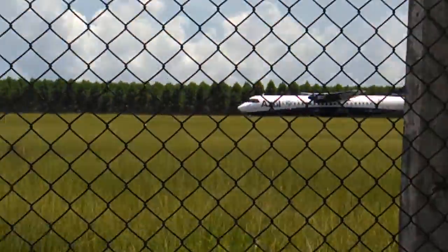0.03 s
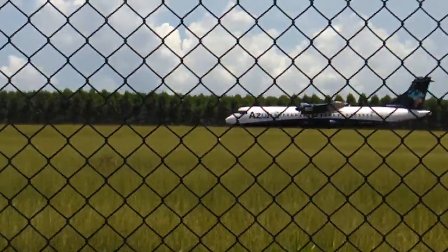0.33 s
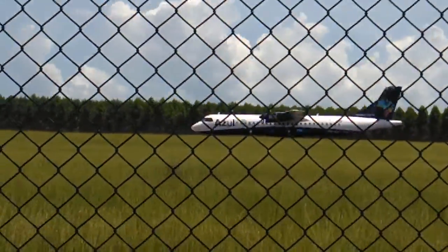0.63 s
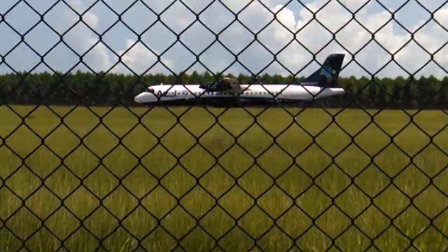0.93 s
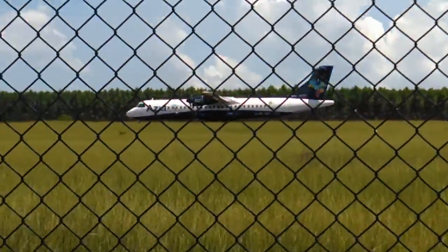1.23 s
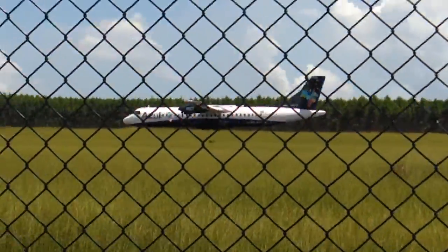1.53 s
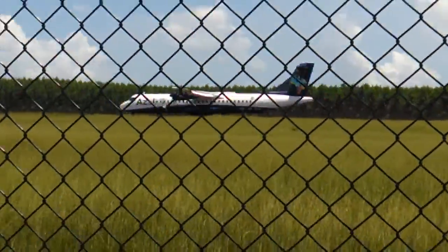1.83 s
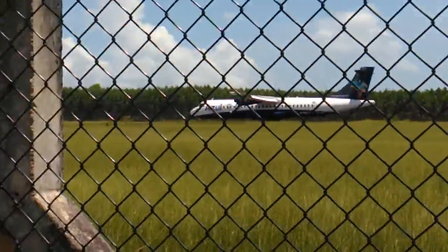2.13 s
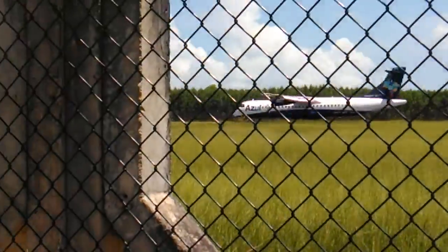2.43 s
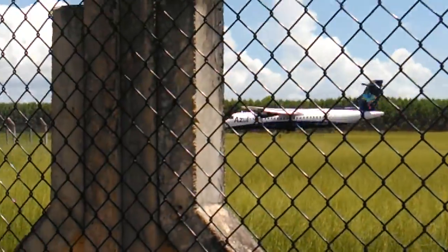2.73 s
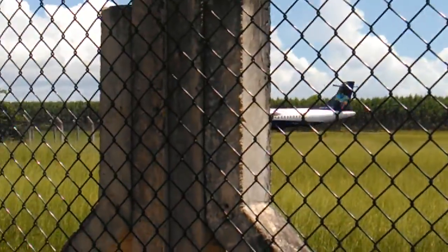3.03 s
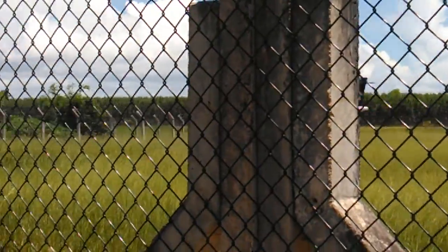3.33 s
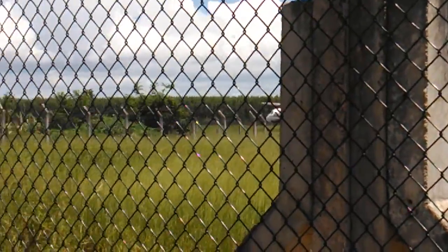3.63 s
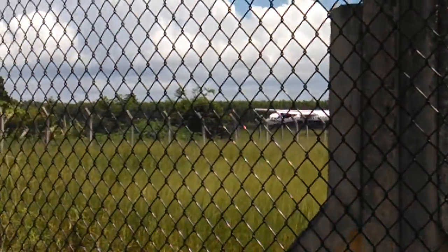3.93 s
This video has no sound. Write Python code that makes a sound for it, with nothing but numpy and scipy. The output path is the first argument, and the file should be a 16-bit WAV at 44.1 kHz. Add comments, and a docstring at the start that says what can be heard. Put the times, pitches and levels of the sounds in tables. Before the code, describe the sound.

A twin-engine propeller plane rolls along a runway with a broad roar, fluttering turbine hiss and a faint low drone. Midway, two gusts of wind rush and whistle over the microphone, then the engines carry on outdoors.

```python
"""Turboprop beyond the fence

A twin turboprop rolls along a runway: a low propeller note sinks under a broad roar and turbine hiss.
The hiss changes colour as the aircraft turns its side and then its tail to the listener.
Two gusts of wind rush over the microphone and sound its hollow resonances."""
import sys
import numpy as np
from scipy import signal
from scipy.fft import rfft, irfft, next_fast_len
from scipy.io import wavfile
from scipy.ndimage import uniform_filter1d, map_coordinates

SR = 44100
rng = np.random.default_rng(int(sys.argv[2]) if len(sys.argv) > 2 else 0)


def put_to_file(sound):
    """Save the sound as 16-bit audio at rate SR, in the file named by the first command-line argument."""
    columns = np.atleast_2d(sound).T  # one column per channel
    safe = np.clip(columns, -1, 1)
    whole_steps = np.round(safe * 32767)
    wavfile.write(sys.argv[1], SR, whole_steps.astype(np.int16))


N = 176400

# Hollow howl of the engine roar that bridges the gusts: time_s, level_db
HOWL_FADER = [(1.4, -53), (1.55, -39), (1.64, -30.5), (1.8, -35.5), (1.92, -35.5), (2.1, -34.5),
              (2.33, -41), (2.48, -51), (2.65, -58)]
# Its single broad hump: frequency_hz, gain_db
HOWL_EQ = [(450, -47), (620, -9), (780, 3), (930, 1.5), (1030, -6), (1200, -24), (2000, -55)]
# Rush of wind on the microphone: time_s, level_db
GUST_FADER = [(0, -63), (1.2, -41), (1.45, -30.5), (1.54, -28), (1.61, -32), (1.68, -22), (1.76, -25),
              (1.84, -28.5), (1.92, -28.5), (2.0, -38.5), (2.09, -33.5), (2.2, -25), (2.25, -23.5),
              (2.31, -20), (2.39, -23.5), (2.47, -28.5), (2.6, -39.5), (2.9, -47), (4, -50)]
# The hollow resonances it sounds: frequency_hz, gain_db
GUST_EQ = [(300, -60), (520, -40), (700, -7.5), (880, -1), (1000, -7), (1130, -7.5), (1280, -0.5),
           (1520, 1.5), (1780, -1), (1930, -8), (2080, 1), (2280, 3), (2430, -1), (2560, 5), (2690, 3),
           (2950, -10), (3400, -7.5), (3680, 3.5), (4000, -2.5), (4400, -9), (4900, -11), (5220, -5),
           (5600, -27), (6500, -11), (8000, -16.5), (10000, -27), (12000, -44), (15000, -62)]
# Whistle on the crest of each gust: time_s, level_db
WHISTLE_FADER = [(1.2, -57), (1.52, -29.5), (1.62, -37.5), (1.68, -20), (1.71, -22), (1.745, -16.5),
                 (1.82, -25), (1.9, -26.5), (2.0, -37), (2.12, -29.5), (2.18, -26.5), (2.27, -25),
                 (2.33, -18), (2.385, -16.5), (2.46, -24.5), (2.57, -33), (2.64, -43.5), (2.9, -60)]
# Its airy colour at rest: frequency_hz, gain_db
WHISTLE_EQ = [(2500, -49), (3500, -20), (4050, -11), (4350, -2), (4750, -1), (4980, -6.5), (5150, 4.5),
              (5370, 0.5), (5600, -3.5), (6000, -3.5), (6600, -10), (7600, -21), (9000, -24.5),
              (10500, -33), (12000, -54), (15000, -66)]
# Its bend, taken as a ratio to the resting pitch in the last row: time_s, pitch_hz
WHISTLE_BEND = [(1.4, 5420), (1.75, 5280), (2.15, 5208), (2.4, 5270)]

# Blade-passing note, sinking: time_s, pitch_hz
BLADE_NOTE = [(0, 95.5), (.5, 94.6), (.9, 89.5), (1.4, 90.7), (2.3, 88.7), (4, 87.3)]
# Its uneven fade: time_s, level_db
BLADE_FADER = [(0, -47), (.2, -49), (.35, -55.5), (.58, -50), (.8, -57.5), (.92, -60), (1.0, -56.5),
               (1.1, -65), (1.2, -57), (1.42, -58.5), (1.68, -73), (1.98, -63.5), (2.1, -67), (2.32, -61),
               (2.44, -76), (2.9, -66), (3.2, -74), (4, -69)]
# Turbine whine as the engines pass: time_s, level_db
WHINE_FADER = [(.55, -57), (.82, -40), (1.1, -39.5), (1.4, -39), (1.7, -50), (2, -72)]
# Its two narrow peaks: frequency_hz, gain_db
WHINE_EQ = [(2300, -45), (2670, 2.5), (3050, -36), (5000, -33), (5430, 3), (5900, -39)]

# Deep rumble under the roar: time_s, level_db
RUMBLE_FADER = [(0, -38.5), (.3, -42.5), (.58, -39), (.9, -48), (1.15, -47), (1.35, -48), (1.45, -44.5),
                (1.58, -52.5), (1.68, -49.5), (1.91, -57), (2.04, -44.5), (2.15, -49.5), (2.3, -49),
                (2.42, -53), (2.9, -50.5), (3.15, -49.5), (3.3, -50), (3.43, -46), (3.55, -48.5),
                (3.71, -43.5), (3.85, -49.5), (4, -52)]
# Its bass weight: frequency_hz, gain_db
RUMBLE_EQ = [(25, -45), (60, -24), (85, -22), (120, -6), (160, -3), (205, 1), (260, -3), (350, -4),
             (700, -53), (2000, -110)]
# Low roar: time_s, level_db
LOW_ROAR_FADER = [(0, -37.5), (.2, -39.5), (.36, -39.5), (.46, -36), (.58, -35.5), (.75, -34.5), (.88, -46),
                  (1.0, -42), (1.11, -38.5), (1.17, -33.5), (1.29, -39.5), (1.35, -44), (1.43, -37),
                  (1.62, -43), (1.8, -45), (1.93, -54.5), (2.05, -50), (2.27, -51.5), (2.4, -52.5),
                  (2.52, -49), (2.65, -54), (2.9, -48), (3.17, -50.5), (3.4, -41.5), (3.7, -46.5),
                  (3.8, -47.5), (4, -42)]
# Its low-mid body: frequency_hz, gain_db
LOW_ROAR_EQ = [(50, -70), (150, -38), (230, -7), (310, -1), (410, -1), (510, -5), (800, -15.5), (1500, -25),
               (4000, -100)]
# Mid roar of the engines: time_s, level_db
MID_ROAR_FADER = [(0, -36), (.2, -35), (.45, -34), (.58, -33), (.72, -39.5), (.82, -34.5), (.88, -39.5),
                  (1.0, -42.5), (1.06, -35.5), (1.19, -35), (1.3, -32), (1.36, -39.5), (1.46, -32.5),
                  (1.6, -39), (1.85, -41), (2.05, -39.5), (2.3, -35.5), (2.45, -50), (2.64, -47),
                  (2.8, -48), (2.93, -45), (3.03, -52), (3.3, -39.5), (3.6, -35), (3.72, -35.5),
                  (3.8, -31.5), (4, -34.5)]
# Its midrange colour: frequency_hz, gain_db
MID_ROAR_EQ = [(150, -63), (400, -44), (520, -6), (640, 0), (860, 0.5), (1000, -1.5), (1160, -10),
               (1450, -3.5), (1900, -12), (2800, -9.5), (5000, -62), (10000, -90)]

# Master fader over all bands of the turbine hiss: time_s, gain_db
HISS_FADER = [(0, -28.5), (.06, -26.5), (.11, -29.5), (.2, -27), (.27, -27.5), (.35, -26), (.5, -28),
              (.63, -26), (.75, -29.5), (.81, -28.5), (.87, -32), (.95, -32), (1.01, -26.5), (1.09, -27.5),
              (1.3, -25.5), (1.37, -28), (1.52, -26.5), (2.0, -31), (2.5, -31.5), (2.64, -34.5),
              (2.8, -33.5), (2.93, -37.5), (3.11, -38.5), (3.16, -32.5), (3.45, -34), (3.7, -34),
              (3.8, -31.5), (3.9, -37.5), (4, -37)]
# Hiss heard from the front: frequency_hz, gain_db
FRONT_EQ = [(650, -35), (1100, -22), (1300, -19), (1550, -10), (1750, -9), (2150, -7.5), (2350, -2),
            (2550, -5.5), (2800, -0.5), (3300, -1.5), (3650, 2.5), (4100, 1), (4450, -5), (4650, -3),
            (5600, -5.5), (6200, -9.5), (8300, -16.5), (10900, -28), (12800, -41), (15500, -47)]
# Hiss heard from the side: frequency_hz, gain_db
SIDE_EQ = [(650, -41), (1100, -7.5), (1550, -11.5), (1750, -12), (2000, -2), (2200, -3), (2400, 1),
           (2650, -0.5), (3000, -1), (3600, -1.5), (4100, 0.5), (4600, -0.5), (4900, -0.5), (5400, 0.5),
           (5950, -5.5), (7300, -9), (8700, -12.5), (11000, -25), (12300, -41), (15500, -60)]
# Hiss heard from the tail: frequency_hz, gain_db
TAIL_EQ = [(650, -33), (1100, -11), (1200, -6.5), (1400, -7), (1650, -9), (1900, 1.5), (2150, -5.5),
           (2550, -2.5), (2700, -3), (2900, 0), (3300, -2), (3700, -1), (4050, -2.5), (4400, 0),
           (4700, -4.5), (5100, -.5), (5700, -5.5), (6250, -10), (7500, -16.5), (8700, -20), (11300, -33.5),
           (12500, -52), (15500, -62)]
# When the front, side and tail face the listener: time_s
FACING_TIMES = [0.55, 1.16, 2.4]
# Boost and cut on the hiss below MIDS_TOP_HZ: time_s, gain_db
MIDS_RIDE = [(0, -13), (.1, 0), (.18, 10.5), (.29, -1.5), (.38, 7), (.48, -7), (.6, 0.5), (.9, 1.5),
             (1.03, 1.5), (1.15, 0.5), (1.5, 0), (2.03, -16), (2.6, -6), (2.74, 2), (2.86, -5.5),
             (3.02, -5), (3.25, -3), (3.55, 4), (3.72, -9), (3.9, 4), (4, 4)]
# Boost and cut on the hiss above TREBLE_BOTTOM_HZ: time_s, gain_db
TREBLE_RIDE = [(0, 2.5), (.5, 2), (.85, 2), (.95, -5.5), (1.05, -3), (1.5, -4), (2.05, 3.5), (2.5, 5.5),
               (2.66, -4.5), (2.92, -8), (3.0, 3.5), (3.1, 1), (3.3, -2), (3.47, 5.5), (3.65, -4),
               (3.84, -3.5), (3.95, -5)]

MIDS_TOP_HZ, TREBLE_BOTTOM_HZ, HIGH_CUT_HZ = 2130, 6460, 15650


def amp(db):
    """Decibels to gain."""
    return 10 ** (np.asarray(db) / 20)


def unit(x):
    """Scale to rms 1."""
    return x / np.sqrt(np.mean(x ** 2) + 1e-20)


def curve(rows):
    """An automation lane: (time_s, value) rows as one value per sample."""
    return np.interp(np.arange(N) / SR, *np.transpose(rows))


def wobble(rate_hz):
    """Smooth random motion through rate_hz points a second."""
    return map_coordinates(rng.standard_normal(8192), [np.arange(N) * rate_hz / SR], mode="wrap")


def fader(rows, flutter_db, rate_hz):
    """Gain that follows a decibel lane with random flutter on top."""
    return amp(curve(rows) + flutter_db * wobble(rate_hz))


def filtered(x, response):
    """Shape x with a gain given as a function of frequency."""
    size = next_fast_len(N + SR // 2)
    return irfft(rfft(x, size) * response(np.fft.rfftfreq(size, 1 / SR)), size)[:N]


def patches(shape, bins, frames):
    """A random frequency-by-time texture of rms 1, smoothed over bins and frames."""
    smeared = uniform_filter1d(rng.standard_normal(shape), size=bins, axis=0)
    return unit(uniform_filter1d(smeared, size=frames, axis=1))


def rush(eq, patchy_db, churn_db):
    """Turbulent noise of rms 1, coloured by eq: narrow patches flicker and broad bands churn."""
    spectrum = signal.stft(rng.standard_normal(N), nperseg=2048)[2]
    narrow_db = patchy_db * patches(spectrum.shape, bins=3, frames=6)
    broad_db = churn_db * patches(spectrum.shape, bins=50, frames=3)
    noise = signal.istft(spectrum * amp(narrow_db + broad_db), nperseg=2048)[1][:N]
    eq_hz, eq_db = np.transpose(eq)
    return unit(filtered(noise, lambda hz: amp(np.interp(np.log(hz + 1), np.log(eq_hz + 1), eq_db))))


def wind():
    """Gusts on the microphone sound a hollow rush and a rough whistle; between them the engines' roar narrows
    to a hollow howl."""
    howl = fader(HOWL_FADER, flutter_db=0.67, rate_hz=50) * rush(HOWL_EQ, patchy_db=1, churn_db=0.3)
    hollow = fader(GUST_FADER, flutter_db=1.05, rate_hz=110) * rush(GUST_EQ, patchy_db=2.5, churn_db=1.6)
    air = rush(WHISTLE_EQ, patchy_db=0.8, churn_db=1.5)
    speed = curve(WHISTLE_BEND) / WHISTLE_BEND[-1][1]
    bent_air = map_coordinates(air, [np.cumsum(speed)], mode="mirror")  # varispeed pitch bend
    whistle = fader(WHISTLE_FADER, flutter_db=1.2, rate_hz=220) * amp(1.3 * wobble(60)) * bent_air
    return howl + hollow + whistle


def propellers():
    """The blade-passing note, wavering slightly in the open air."""
    pitch_hz = curve(BLADE_NOTE) + 0.22 * wobble(8.8)
    note = unit(np.sin(2 * np.pi * np.cumsum(pitch_hz) / SR))
    return fader(BLADE_FADER, flutter_db=0.97, rate_hz=8.1) * note


def turbine_whine():
    """Two faint, fuzzy bands about an octave apart, heard as the engines pass."""
    return fader(WHINE_FADER, flutter_db=1.2, rate_hz=40) * rush(WHINE_EQ, patchy_db=3, churn_db=0)


def engine_roar():
    """Propeller wash and exhaust: a rumble, a low roar and a mid band, each churning on its own."""
    rumble = fader(RUMBLE_FADER, flutter_db=0.51, rate_hz=32)
    rumble *= rush(RUMBLE_EQ, patchy_db=3, churn_db=1)
    low = fader(LOW_ROAR_FADER, flutter_db=2.53, rate_hz=45)
    low *= rush(LOW_ROAR_EQ, patchy_db=1.96, churn_db=1)
    mid = fader(MID_ROAR_FADER, flutter_db=1.68, rate_hz=55)
    mid *= rush(MID_ROAR_EQ, patchy_db=2.55, churn_db=0.3)
    return rumble + low + mid


def turbine_hiss():
    """Fluttering hiss that turns from front to side to tail; its mids and treble come and go."""
    hiss = np.zeros(N)
    for facing, eq in zip(np.eye(3), [FRONT_EQ, SIDE_EQ, TAIL_EQ]):
        share = curve(np.column_stack([FACING_TIMES, facing]))
        hiss += np.sqrt(share) * rush(eq, patchy_db=2.03, churn_db=1.86)  # equal-power crossfade
    # Split into three bands so that each moves on its own.
    mids = filtered(hiss, lambda hz: 1 / (1 + (hz / MIDS_TOP_HZ) ** 10))
    treble = filtered(hiss, lambda hz: 1 - 1 / (1 + (hz / TREBLE_BOTTOM_HZ) ** 10))
    presence = hiss - mids - treble
    presence *= amp(0.82 * wobble(85))
    mids *= fader(MIDS_RIDE, flutter_db=2.6, rate_hz=80)
    treble *= amp(curve(TREBLE_RIDE))
    master = fader(HISS_FADER, flutter_db=0.1, rate_hz=30.14)
    grit = amp(0.61 * wobble(260))
    return master * grit * (mids + presence + treble)


def scene():
    """The aircraft and the wind, mixed in mono."""
    return (propellers() + engine_roar() + turbine_hiss() + wind() + turbine_whine())[None]


def record(dry):
    """A brick-wall high cut on the mix."""
    return filtered(dry[0], lambda hz: hz < HIGH_CUT_HZ)[None]


dry = scene()
out = record(dry)
put_to_file(out)
```